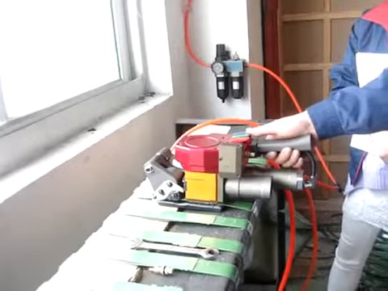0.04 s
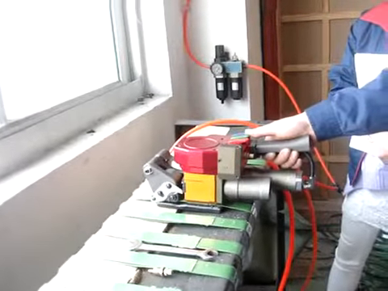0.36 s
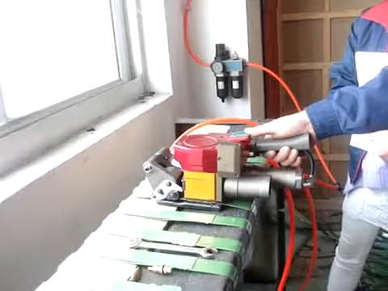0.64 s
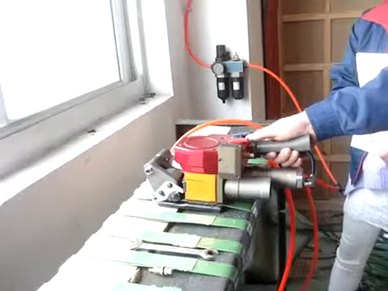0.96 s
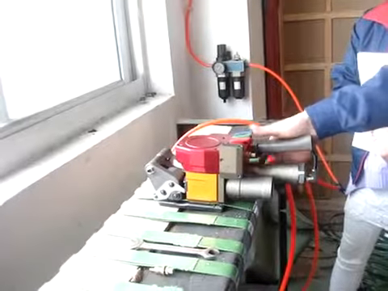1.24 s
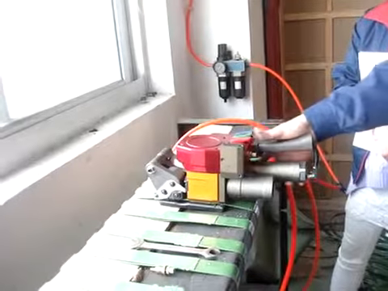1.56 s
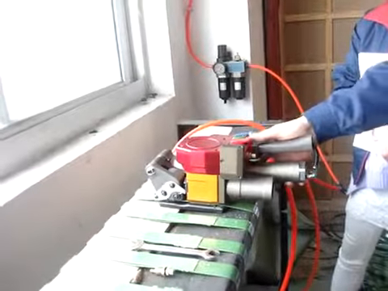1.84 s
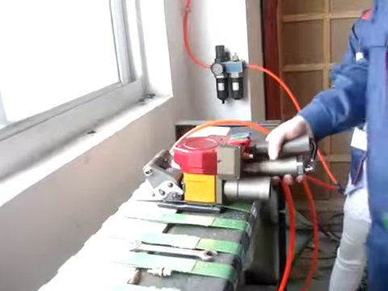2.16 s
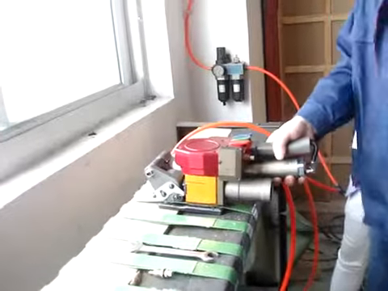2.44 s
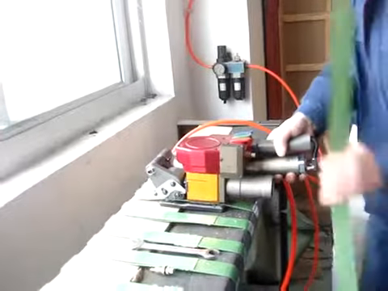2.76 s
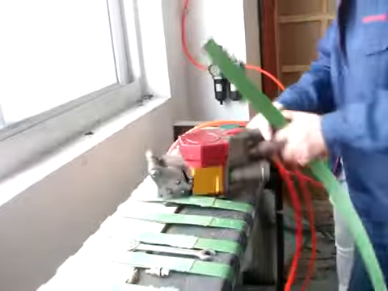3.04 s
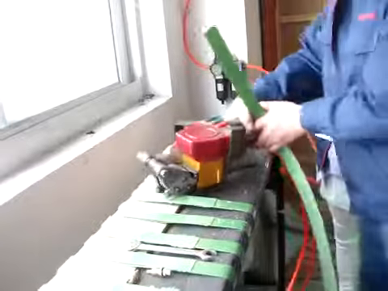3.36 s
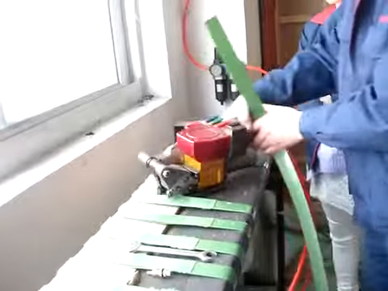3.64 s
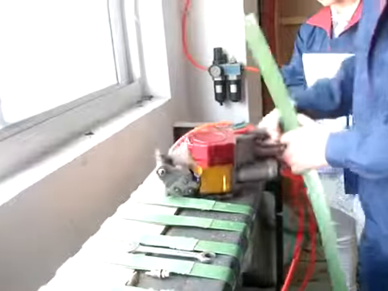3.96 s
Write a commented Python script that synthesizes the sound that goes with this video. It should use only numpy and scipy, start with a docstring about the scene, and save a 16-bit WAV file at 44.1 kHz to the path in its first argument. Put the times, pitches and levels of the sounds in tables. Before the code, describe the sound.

An air-powered strapping tool whines and hisses in three short bursts, then is set down rattling.

```python
"""An air-powered strapping tool whines three times as its motor spins and its exhaust hisses.
Its valve clicks and its body knocks on the bench; then it is pulled off the strap and set down,
rattling its loose jaws. Around it, an echoing workshop hums, with far puffs of air and one crash.
An automatic volume control turns everything down at each loud sound and lets it creep back."""
import sys
import numpy as np
from scipy import signal
from scipy.fft import rfft, irfft, next_fast_len
from scipy.io import wavfile
from scipy.ndimage import uniform_filter1d, minimum_filter1d, map_coordinates

SR = 44100
rng = np.random.default_rng(int(sys.argv[2]) if len(sys.argv) > 2 else 0)


def int16_out(signal):
    """Quantize to a 16-bit WAV file."""
    q = np.round(np.clip(np.atleast_2d(signal).T, -1, 1) * 32767)
    wavfile.write(sys.argv[1], SR, q.astype(np.int16))


N = 176400
T = np.arange(N) / SR
TOP_HZ = 10100  # highest frequency kept

# A "colour" says how strong a sound is from low to high.
# workshop background (frequency [Hz], level [dB])
DIN_COLOUR = [(20, -17), (55, -12.5), (85, -7), (140, -4), (230, -3.5), (345, 2.5), (480, -3), (950, -3),
              (1600, -10), (3000, -14), (5000, -21.5), (7500, -27), (8300, -30), (10000, -38)]
# its rise and fall (time [s], level [dB])
DIN_LEVELS = [(0, -29), (.4, -28), (.8, -27), (1.5, -22.5), (2.4, -28.5), (3.1, -30), (3.6, -25.5),
              (4, -29)]
# a machine's hum swells (time [s], width [s], level [dB])
HUM_SWELLS = [(.02, 0.022, -48), (.785, 0.028, -26.5), (3.76, 0.075, -30.5)]
# air let off far away (open [s], close [s], level [dB])
FAR_PUFFS = [(0.056, 0.269, -35.5), (1.656, 1.686, -18), (2.755, 2.855, -35.5), (2.965, 3.056, -41)]
# far hiss (frequency [Hz], level [dB])
PUFF_COLOUR = [(500, -9.5), (2000, -7), (3500, -5), (6500, -1), (8500, -8), (10000, -12.5)]
# hand and strap rub (time [s], length [s], level [dB])
SCRAPES = [(0.643, 0.037, -35.5), (2.819, 0.0082, -30.5), (2.862, .01, -25.5), (3.813, 0.031, -27)]
# rubbed strap (frequency [Hz], level [dB])
STRAP_COLOUR = [(500, -16), (1500, 1), (3200, 2.5), (4500, 0.5), (6000, -12.5), (10000, -28.5)]
# valve and lever click (time [s], level [dB])
CLICKS = [(.828, 7), (.843, 15), (2.19, 8), (2.203, 0), (2.208, -0.5), (2.759, -22.5), (2.968, -27),
          (3.1175, -6.5), (3.488, -21)]
# struck steel (frequency [Hz], level [dB])
STEEL_COLOUR = [(500, -10.5), (1700, -20), (3100, -1), (3700, -17), (4900, -7), (5900, 1), (7300, -4),
                (8600, -2), (10000, -11)]
# air leaves the tool (open [s], close [s], level [dB])
BLASTS = [(0.83, 0.962, 3.5), (0.988, 1.243, 2.5), (1.8952, 2.056, 0.5)]
# its hiss (frequency [Hz], level [dB])
EXHAUST_COLOUR = [(100, -42), (400, -26), (900, -12), (2000, -5.5), (3800, -1), (5200, 2.5), (7000, 2.5),
                  (8500, 2), (10000, -2.5)]
# knocks on the tool (time [s], level [dB])
KNOCKS = [(.843, -1.5), (1.917, 2.5), (2.189, -5), (2.228, -9), (2.759, -13.5), (3.09, -22), (3.115, -9.5),
          (3.122, -20.5), (3.133, -22.5), (3.235, -16.5), (3.488, -11.5)]
# the tool's body (frequency [Hz], level [dB])
BODY_COLOUR = [(60, -29), (300, -9.5), (620, 2), (950, 0), (1450, 5), (2200, -4), (2800, -3), (4000, -4.5),
               (10000, -32)]
# motor runs (start [s], air off [s], top pitch [Hz], spin-up time [s], level [dB])
MOTOR_RUNS = [(0.85, 0.905, 769.6, .016, 8), (.996, 1.202, 793.5, .0265, 8), (1.915, 2.02, 819, .017, 5.5)]
# the motor's whine (frequency [Hz], level [dB])
WHINE_COLOUR = [(300, -13), (600, -8.5), (790, -10), (830, -12), (1250, -4), (1600, -7), (1950, -6),
                (2230, -0.5), (2420, 1), (2650, -4.5), (3200, -8.5), (3900, -14), (4080, -10), (4400, -20),
                (5000, -16), (9000, -38)]
# rushing air in each motor pulse (frequency [Hz], level [dB])
CHUFF_COLOUR = [(300, -43), (700, -16.5), (1400, 4.5), (2500, 4), (3600, 15), (9000, -49.5)]
# bumps on the bench (time [s], level [dB])
THUDS = [(1.897, -17.5), (2.188, -14), (3.165, -24)]
# the bench's boom (frequency [Hz], level [dB])
BENCH_COLOUR = [(20, -9), (50, 1.5), (120, -6), (300, -12), (1000, -34)]
# the far crash (frequency [Hz], level [dB])
CRASH_COLOUR = [(150, -20), (500, -14), (1100, -2.5), (1600, -10), (2600, -16), (6000, -35), (10000, -35)]
# light taps of metal (time [s], level [dB])
CLINKS = [(2.968, -17.5), (3.007, -35)]
# their ring (frequency [Hz], level [dB])
CLINK_COLOUR = [(1000, -26), (3300, -13.5), (3750, -4), (3970, -3), (4200, -20.5), (9000, -40)]
# loose jaws hit together (time [s], level [dB])
JAW_HITS = [(3.166, 1), (3.172, -4.5), (3.1795, -3), (3.185, 2), (3.191, -17)]
# the jaws' steel plates (frequency [Hz], level [dB])
JAW_COLOUR = [(500, -41), (1700, 0), (2400, -7.5), (3100, -3.5), (3700, -14), (4400, -5), (4900, -8),
              (5600, 3.5), (6200, 0), (6700, 8.5), (7300, -6), (8300, -2), (9000, -5), (10000, -14.5)]
# the hall's echo (frequency [Hz], time to fade by 60 dB [s])
ECHO_TIMES = [(100, 0.27), (800, 1.92), (2400, 1.15), (5000, 1.067), (7000, 0.88), (10000, 0.65)]


def amp(db):
    """Turn decibels into a multiplier."""
    return 10 ** (np.asarray(db) / 20)


def along(points, hz):
    """Read a table between its rows, on a log frequency scale."""
    freqs, values = np.transpose(points)
    return np.interp(np.log(hz + 1), np.log(freqs + 1), values)


def wobble(rate):
    """A smooth curve through `rate` random points a second."""
    return map_coordinates(rng.standard_normal(int(N * rate / SR) + 4), [T * rate])


def filtered(x, response):
    """Multiply each frequency in x by response(hz)."""
    size = next_fast_len(N + SR // 2)
    return irfft(rfft(x, size) * response(np.fft.rfftfreq(size, 1 / SR)), size)[:N]


def noise(colour):
    """Noise of the given colour, with an average power of 1."""
    x = filtered(rng.standard_normal(N), lambda hz: amp(along(colour, hz)) * (hz < TOP_HZ))
    return x / np.sqrt(np.mean(x ** 2) + 1e-20)


def burst(start, stop, rise_s, fall_s):
    """A level that builds, holds, then dies away."""
    rise = 1 - np.exp(-np.maximum(T - start, 0) / rise_s)
    return rise * np.exp(-np.maximum(T - stop, 0) / fall_s)


def strikes(rows, colour, fade_s):
    """Each hit starts a noisy ring that drops 60 dB in fade_s."""
    level = sum(amp(db) * (T >= s) * amp(-60 * np.maximum(T - s, 0) / fade_s) for s, db in rows)
    return level * noise(colour)


def echo(x):
    """The hall's echo: each frequency dies at its own speed."""
    hz, t, spectrum = signal.stft(rng.standard_normal(2 * SR), SR, nperseg=256)
    fade = amp(-60 * t / along(ECHO_TIMES, hz)[:, None])
    tail = signal.istft(spectrum * fade, SR, nperseg=256)[1]
    return signal.fftconvolve(x, tail / np.linalg.norm(tail))[:N]


def workshop_din():
    """Background noise slowly rises and falls."""
    level_db = np.interp(T, *np.transpose(DIN_LEVELS)) + 0.21 * wobble(7.2)
    return amp(level_db) * noise(DIN_COLOUR)


def machine_hum(pitch_hz=344):
    """A machine holds one wavering note that swells three times."""
    swells = sum(amp(db) * np.exp(-.5 * ((T - s) / width) ** 2) for s, width, db in HUM_SWELLS)
    return (amp(-43.5) + swells) * np.sin(2 * np.pi * pitch_hz * T + 1.3 * wobble(22))


def far_puffs():
    """Air is let off elsewhere in the workshop."""
    flow = sum(amp(db) * burst(start, stop, 0.0036, 0.044) for start, stop, db in FAR_PUFFS)
    hiss = flow * noise(PUFF_COLOUR)
    return amp(-0.5) * hiss + amp(-1.5) * echo(hiss)


def strap_scrapes():
    """Hand and strap rub in short, rough strokes."""
    strokes = sum(amp(db) * burst(s, s + length, 0.001, 0.0067) for s, length, db in SCRAPES)
    scrapes = strokes * amp(2.5 * wobble(250)) * noise(STRAP_COLOUR)
    return scrapes + amp(-1.5) * echo(scrapes)


def valve_clicks():
    """The steel valve and lever snap and ring very briefly."""
    clicks = strikes(CLICKS, STEEL_COLOUR, fade_s=0.016)
    return clicks + amp(-3.5) * echo(clicks)


def exhaust():
    """Air hisses from the tool while the valve is open."""
    flow = sum(amp(db) * burst(start, stop, 0.0054, 0.015) for start, stop, db in BLASTS)
    hiss = flow * amp(0.65 * wobble(60)) * noise(EXHAUST_COLOUR)
    return hiss + amp(-3.5) * echo(hiss)


def body_knocks():
    """The tool's body clacks when it is knocked."""
    knocks = strikes(KNOCKS, BODY_COLOUR, fade_s=0.07)
    return knocks + amp(-3.5) * echo(knocks)


def motor(coast_s=0.1, fade_s=0.038, flutter=0.0039, waver_db=2.2, blur_radians=0.69):
    """Each spinning blade lets out a pulse of air; the fast pulses blend into a whine."""
    pitch_hz, level = np.zeros(N), np.zeros(N)
    for start, air_off, top_hz, spin_up_s, db in MOTOR_RUNS:
        spin_up = 1 - np.exp(-np.maximum(T - start, 0) / spin_up_s)
        coasting = np.maximum(T - air_off, 0)
        speed = spin_up * np.exp(-(coasting / coast_s) ** 1.5)
        pitch_hz = np.maximum(pitch_hz, top_hz * speed)
        level += amp(db) * speed ** 1.2 * np.exp(-coasting / fade_s)
    phase = 2 * np.pi * np.cumsum(pitch_hz * (1 + flutter * wobble(150))) / SR
    chuff = amp(-17.5) * noise(CHUFF_COLOUR) * (1 + np.cos(phase))
    direct = blurred = chuff
    for k in range(1, 8):  # tones at 1 to 7 times the pitch
        strength = amp(along(WHINE_COLOUR, k * pitch_hz) + waver_db * wobble(45.44))
        direct = direct + strength * np.cos(k * phase)
        # the echo's copy drifts slightly out of step
        blurred = blurred + strength * np.cos(k * phase + blur_radians * wobble(28.06))
    return level * direct + amp(-4.5) * echo(level * blurred)


def bench_thuds():
    """Bumps travel through the bench as low thuds."""
    return strikes(THUDS, BENCH_COLOUR, fade_s=0.073)


def far_crash(start_s=2.52, level_db=-16):
    """One distant crash rolls round the hall."""
    return strikes([(start_s, level_db)], CRASH_COLOUR, fade_s=1.25)


def metal_clinks():
    """Lightly tapped metal gives a short, high ring."""
    clinks = strikes(CLINKS, CLINK_COLOUR, fade_s=0.086)
    return clinks + amp(-11.5) * echo(clinks)


def jaw_rattle():
    """The loose jaws clatter as the tool is set down, and their plates ring on."""
    clatter = strikes(JAW_HITS, JAW_COLOUR, fade_s=0.011)
    ring = amp(-23.5) * strikes(JAW_HITS, JAW_COLOUR, fade_s=0.47)
    rattle = clatter + ring
    return rattle + amp(-1) * echo(rattle)


def scene():
    """Add up all the sounds, the same in both channels."""
    workshop = workshop_din() + machine_hum() + far_puffs() + far_crash()
    tool = valve_clicks() + exhaust() + motor()
    handling = strap_scrapes() + body_knocks() + bench_thuds() + metal_clinks() + jaw_rattle()
    mono = workshop + tool + handling
    return np.array([mono, mono])


def record(dry, limit_db=-19, detect_s=0.0046, hold_s=0.31, recover_db_per_s=22):
    """Loud sounds turn the volume down at once; it waits, then creeps back. The top treble is cut."""
    power = np.abs(uniform_filter1d(dry[0] ** 2, int(detect_s * SR)))
    needed_db = np.minimum(0, limit_db - 10 * np.log10(power + 1e-12))
    half_hold = int(hold_s * SR / 2)
    held_db = minimum_filter1d(needed_db, 2 * half_hold + 1, origin=half_hold, mode="nearest")
    climb_db = recover_db_per_s * T
    gain_db = np.minimum.accumulate(held_db - climb_db) + climb_db
    turned_down = dry * amp(uniform_filter1d(gain_db, size=64))
    return np.array([filtered(channel, lambda hz: hz < TOP_HZ) for channel in turned_down])


dry = scene()
out = record(dry)
int16_out(out)
```